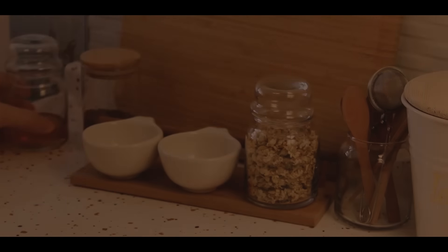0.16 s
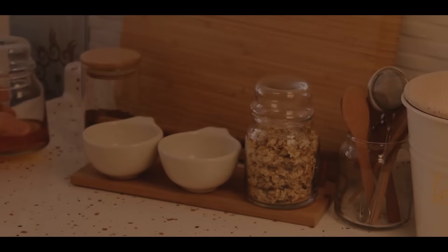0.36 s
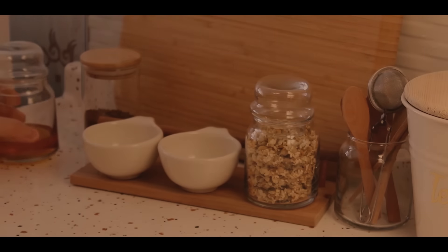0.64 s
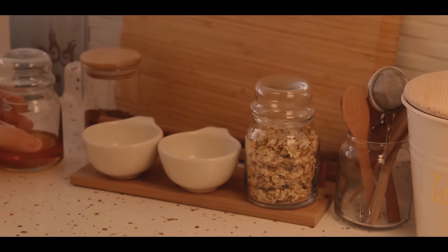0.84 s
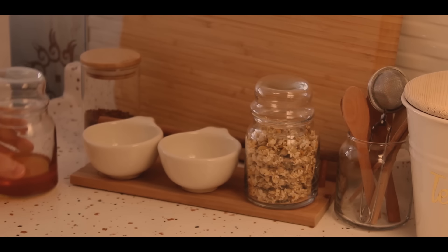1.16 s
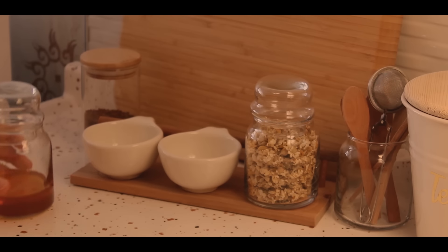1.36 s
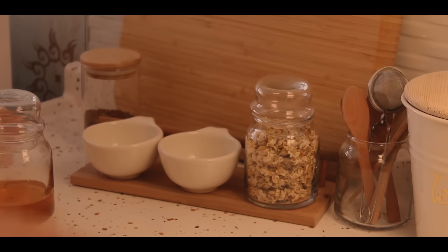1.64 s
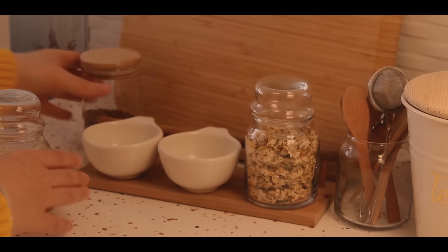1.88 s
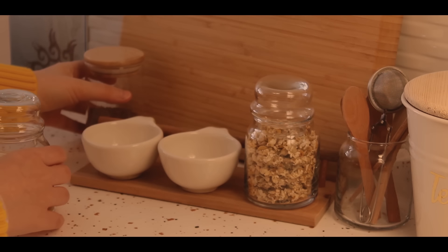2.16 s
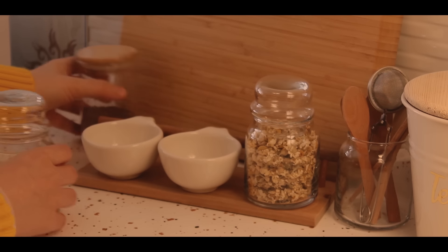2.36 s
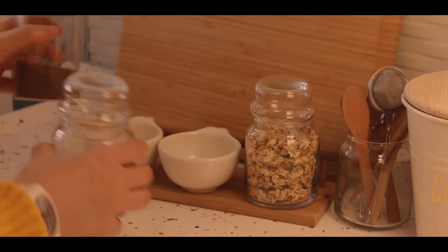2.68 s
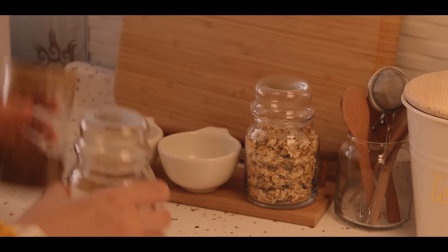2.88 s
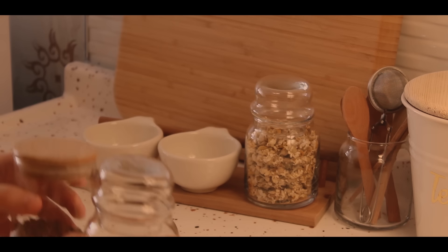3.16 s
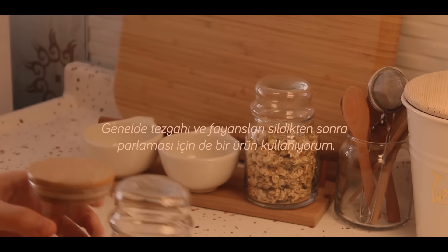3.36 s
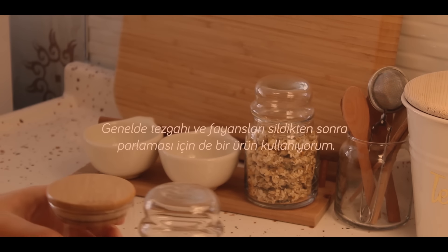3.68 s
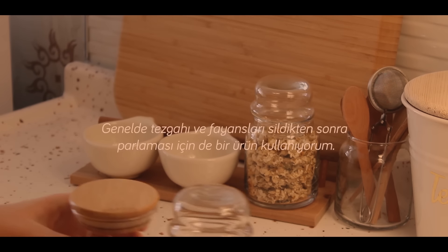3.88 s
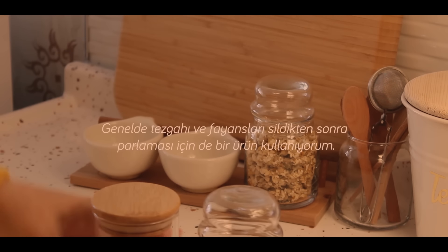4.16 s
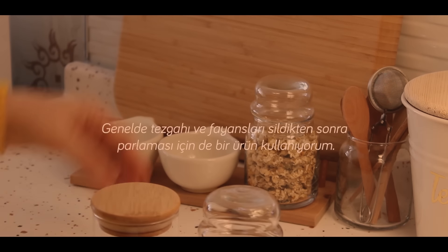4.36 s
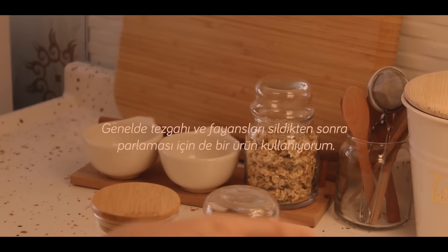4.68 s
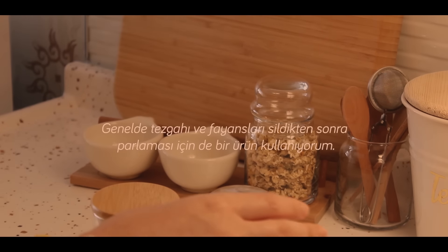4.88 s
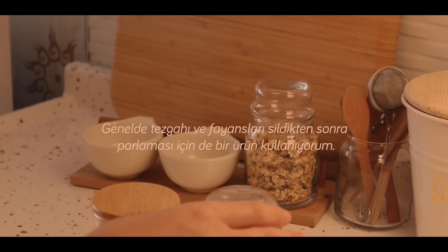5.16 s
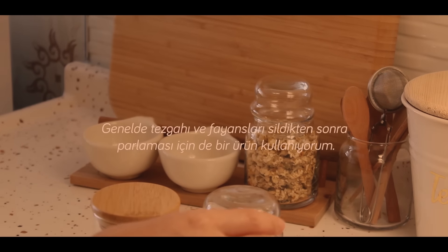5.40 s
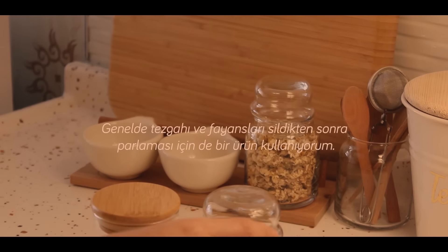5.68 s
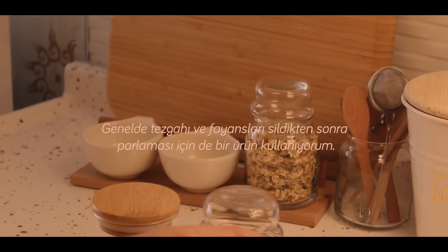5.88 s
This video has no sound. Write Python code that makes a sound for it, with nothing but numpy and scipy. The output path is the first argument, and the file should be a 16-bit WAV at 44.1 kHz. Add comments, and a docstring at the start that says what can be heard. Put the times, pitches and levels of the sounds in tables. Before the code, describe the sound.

A jar clacks down on a stone worktop, a canister lands with a loud knock and rocks, then glass knocks and light fingertip ticks follow.

```python
"""In a small, hard-walled kitchen, glass jars and a wooden-lidded canister move about on a stone countertop.
A jar is slid and set down, the canister bumps off its board, lands and rocks, a glass stopper knocks,
fingers tick on glass. Each blow is a coloured clack with near echoes, ringing tones and a diffuse room tail.
Slides are tiny random slips through a moving resonance; filtered noise and wavering sines make air and hum.
The recorder's noise suppressor shortens the tails."""
import sys
import numpy as np
from scipy import signal
from scipy.fft import rfft, irfft
from scipy.io import wavfile
from scipy.ndimage import uniform_filter1d

SR = 44100
rng = np.random.default_rng(int(sys.argv[2]) if len(sys.argv) > 2 else 0)


def bounce(signal):
    """Save signal as a 16-bit WAV file at the path given by the first command-line argument."""
    frames = np.transpose(np.atleast_2d(signal))
    limited = np.clip(frames, -1, 1)
    pcm = np.round(limited * 32767).astype(np.int16)
    wavfile.write(sys.argv[1], SR, pcm)


N = 266099
T = np.arange(N) / SR
HZ = np.fft.rfftfreq(N, 1 / SR) + 1e-3  # just above zero, for the log axis

# broad colour of a blow on each thing: (frequency [Hz], relative level [dB])
JAR_BODY = [(90, -61.5), (150, -30.5), (230, -34), (341, -14.5), (520, -4.5), (740, -6), (880, -7),
            (1240, -5), (1440, -9), (1740, -10.5), (2070, -19), (2550, -30.5), (3500, -43.5), (5000, -64),
            (9000, -83)]
BOARD_BODY = [(120, -83.5), (200, -73), (338, -13), (390, 2), (520, -18), (630, -11), (682, -5.5),
              (1210, -8.5), (1330, -10), (1400, -13.5), (1690, -8.5), (2110, -28), (2440, -22.5),
              (9000, -67), (11700, -107), (19800, -120)]
CANISTER_BODY = [(55, -57.5), (95, -23), (135, -26.5), (174, -21), (213, -23), (379, -7), (490, -7.5),
                 (600, -5), (778, -1), (1500, -4), (2240, -10.5), (3280, -23.5), (5000, -38), (8600, -66),
                 (14000, -65.5)]
RIM_BODY = [(160, -66.5), (280, -15), (484, -5.5), (556, -2), (938, -3), (1250, -6), (1380, -3),
            (1540, -0.5), (1930, -11), (2300, -7), (3140, -14.5), (5500, -60), (7150, -90.5), (12100, -120)]
LID_BODY = [(240, -71), (400, -30.5), (455, -34.5), (548, -16.5), (661, -18), (1210, -2.5), (1510, -5),
            (1760, -18), (1910, -13), (2770, -18), (3540, -23.5), (6500, -59), (8450, -91), (14300, -120)]
STOPPER_BODY = [(110, -32), (180, -48.5), (255, -30), (350, 0), (440, -8.5), (560, -17), (760, 3.5),
                (930, -4), (1080, -22.5), (1350, -1.5), (1560, -20), (1850, -9.5), (2400, -24),
                (3200, -25.5), (4400, -48.5), (6000, -62), (10000, -83.5)]
TICK_BODY = [(300, 3.5), (800, -0.5), (1300, 3), (2200, -6), (3200, -5), (5200, -7.5), (7000, -13),
             (10000, -13.5), (13000, -19), (15000, -27.5)]
# tones that linger in each thing, the surface under it and the corner of the room:
# (frequency [Hz], relative level [dB])
JAR_MODES = [(522, 5), (574, 9.5), (607, -6.5), (729, 7.5), (797, -14.5), (869, -24.5), (928, -5.5),
             (1048, -14.5), (1121, -17.5), (1150, -17.5), (1190, -10), (1227, 3.5), (1265, 9.5),
             (1291, 4.5), (1359, -19), (1666, -14.5), (1690, 7.5), (1737, 3)]
BOARD_MODES = [(394, 4), (426, -14.5), (683, 0), (752, -19), (777, -6), (842, 4.5), (874, -10), (914, -23),
               (946, -12), (986, -12), (1048, -10), (1087, -2.5), (1129, -14), (1293, 2), (1475, -22),
               (1647, -22), (1687, -15), (1738, -4), (2349, -14), (2635, -18)]
CANISTER_MODES = [(176, -18), (386, -9.5), (496, -0.5), (543, -6), (672, -11.5), (750, -2.5), (784, -4),
                  (861, -3), (926, -3.5), (988, -3), (1025, 0), (1062, 1), (1124, -6.5), (1179, -4),
                  (1211, -1), (1289, -1), (1320, 0.5), (1355, -4), (1390, -10), (1453, -4.5), (1496, -2),
                  (1529, 3), (1772, -4.5), (1846, -1.5), (1878, -7), (1941, -9), (2069, -12.5),
                  (2201, -12.5), (2311, -6.5), (2434, -6)]
RIM_MODES = [(565, 6), (591, 1.5), (723, -8), (794, 2), (826, 2), (939, -6), (984, 1.5), (1063, 7.5),
             (1143, -5), (1212, 7.5), (1289, -20), (1513, 10.5), (1548, -16), (1604, -18), (1681, 5),
             (2281, -18.5), (2350, -7), (2647, -20)]
LID_MODES = [(796, -8.5), (1042, 3.5), (1098, -2), (1135, -20), (1179, -14), (1243, 6.5), (1291, 11.5),
             (1321, -16), (1394, -9.5), (1514, -7.5), (1544, 1.5), (1684, 3.5), (1973, -1.5), (2295, -21.5),
             (2432, 0), (2673, -11)]
STOPPER_MODES = [(298, -15.5), (357, -6.5), (396, -8.5), (498, -7), (653, -15), (690, -17.5), (739, -8),
                 (773, -25), (799, -13.5), (826, -18), (859, -19), (898, -6.5), (945, 2.5), (981, -6),
                 (1300, -11.5), (1342, -13), (1392, -27.5), (1762, -16), (2050, -21)]
TICK_MODES = [(1288, -0.5), (1420, -9), (2350, -7.5), (3120, -8), (3350, -10.5), (4150, -9), (4480, -8.5),
              (5300, -13), (5850, -14), (6500, -11.5), (8500, -7.5)]
# what is struck, by name: (body, modes, level of the modes against the room tail [dB],
# decay time of tones and tail [share of ROOM_T60])
THINGS = {"jar": (JAR_BODY, JAR_MODES, 0, 0.75), "board": (BOARD_BODY, BOARD_MODES, 0, 0.75),
          "canister": (CANISTER_BODY, CANISTER_MODES, 0.74, 0.84), "rim": (RIM_BODY, RIM_MODES, -0.3, 0.97),
          "lid": (LID_BODY, LID_MODES, -1.9, 0.74), "stopper": (STOPPER_BODY, STOPPER_MODES, 0.96, 0.84),
          "tick": (TICK_BODY, TICK_MODES, -4, .85)}
# blows: (time [s], thing, level [dB], high edge set by the hardness of the contact [Hz],
# lingering part against the clack [dB])
BLOWS = [ (0.8417, "jar", 5.5, 9000, 0.5), (0.961, "jar", -3.5, 1020, 0), (1.097, "jar", -14.5, 801, 3.5),
         (1.272, "jar", -17.5, 851, -3.5), (1.430, "jar", -16.5, 993, -2.5),
         (2.312, "board", 0, 12000, 3.5), (3.5430, "canister", 14.5, 15000, 1.5),
         (3.7110, "rim", 5.5, 9000, -2.5), (3.8620, "lid", 1.5, 8900, 2.5), (4.035, "lid", -13.5, 2045, 4),
         (5.175, "stopper", -9, 554, 9), (5.2166, "stopper", 11.5, 9050, -1.5),
         (5.275, "stopper", 3, 1567, -5.5), (5.462, "stopper", -24, 1097, 6),
         (6.013, "stopper", -6, 328, -5), ]
# reflections from worktop, back wall and cupboards, before scatter: (delay [s], level [dB])
NEAR_ECHOES = [(.0012, -11.5), (.0023, -7), (.0041, -6.5), (.0064, -10.5), (.018, -8.5)]
# room decay before each sound's stretch: (frequency [Hz], time to fall 60 dB [s])
ROOM_T60 = [(150, .58), (500, 0.53), (1400, 0.49), (3500, 0.41), (7000, 0.16), (14000, 0.2)]
# colour of the still room air: (frequency [Hz], relative level [dB])
AIR = [(15, -39.5), (25, -13), (71, -18.5), (101, -8), (125, -8.5), (196, -4.5), (363, -4.5), (394, -3),
       (488, -3), (769, -5), (13500, -31.5), (15000, -49.5)]
# appliance hum before waver and suppression make-up: (frequency [Hz], rms level [dB])
HUM = [(50, -92), (100, -83), (197, -82.5), (290, -76.5), (395, -77.5), (445, -81.5), (494, -77)]
# round trips of a blow inside the vessel and the slab, before scatter: (time [s])
SLAB_PATHS_S = [.00027, .00075]
# fingers on glass: (time [s], level [dB], low edge, low for a fingertip and high for a nail [Hz])
TICKS = [(5.034, -24.5, 600), (5.177, -20.5, 118.4), (5.418, -29.5, 4500), (5.478, -21.5, 3330),
         (5.559, -17.5, 2900), (5.881, -13, 900), (5.915, -22, 3560), (6.007, -13, 3900),
         (6.017, -12, 4000)]
# pushes of the glass base over the stone, level before the swell and sag:
# (time [s], length [s], rms level [dB], first resonance [Hz], last resonance [Hz])
PUSHES = [(0.179, 0.2, -59.5, 690, 700), (0.342, 0.087, -53, 1180, 1240), (1.02, 0.3, -46.5, 642, 463),
          (1.26, 0.43, -47, 624, 933)]
# things whose blows make the canister's glass wall click: (thing)
CLICKING = ("canister", "rim")

AIR_DB = -66  # rms, before waver and suppression make-up
SUPPRESSION_DB = 4.5  # how far the recorder turns down a shut band
TOP_HZ = 15200  # the recorder's upper limit
# a heavier blow moves more of the slab: low edge at 0 dB, and the extra force that lowers it an octave
BASS_EDGE_HZ, BASS_OCTAVE_DB = 250, 16
# wall click: level at a blow of 0 dB, dB gained per dB of blow, then its band and lingering part
CLICK_DB, CLICK_GROWTH = -43.5, 1.72
CLICK_LOW_HZ, CLICK_HIGH_HZ, CLICK_LINGER_DB = 7500, 12440, 3
# a sharper tick also reaches higher: band of a nail, and how the high edge follows the low one (exponent)
NAIL_LOW_HZ, NAIL_HIGH_HZ, TICK_EDGE_POWER = 3400, 13100, 0.48
TICK_LINGER_DB = 0
# the finger slips and catches once more, this much later and weaker
CATCH_S, CATCH_DB = 0.005, -7
# every push swells quickly, eases off as the hand slows and dies away
PUSH_ATTACK_S, PUSH_SAG_DB_PER_S, PUSH_RELEASE_S = 0.024, 30.5, 0.087


def undb(db):
    """Decibels to gain."""
    return 10 ** (np.asarray(db) / 20)


def unit(x):
    """Scale to an energy of 1."""
    return x / np.sqrt(np.sum(x ** 2))


def level(x, db):
    """Scale by the standard deviation to an rms level in dB."""
    return x * undb(db) / np.std(x)


def along(points, hz):
    """Read (Hz, value) points on a log-frequency axis."""
    f, value = np.transpose(points)
    return np.interp(np.log(hz), np.log(f), value)


def colour(x, points):
    """Causal minimum-phase filter with the given (Hz, dB) response, made by folding its cepstrum."""
    log_gain = np.log(undb(along(points, HZ)))
    cepstrum = irfft(log_gain, N)[:2048]
    cepstrum[1:] *= 2
    response = irfft(np.exp(rfft(cepstrum, 8192)))[:2048]
    return signal.fftconvolve(x, response)[:len(x)]


def band(x, low_hz, high_hz, order=2):
    """Band-pass between two edges."""
    high_hz = min(high_hz, .47 * SR)
    low_hz = min(low_hz, high_hz / 2)
    sos = signal.butter(order, [low_hz, high_hz], "band", fs=SR, output="sos")
    return signal.sosfilt(sos, x)


def walk(rate):
    """Slow random drift with a spread of 1, heading for a new value rate times a second."""
    hold = int(SR / rate)
    steps = np.repeat(rng.standard_normal(N // hold + 1), hold)
    return level(uniform_filter1d(steps, hold)[:N], 0)


def add(out, s, x):
    """Mix x into out from time s."""
    i = int(s * SR)
    out[i:i + len(x)] += x[:N - i]


def kitchen(waver_db=3.5, drift=1.0):
    """Still room air and the slightly wavering hum of an appliance."""
    air = level(colour(rng.standard_normal(N), AIR), AIR_DB) * undb(0.18 * walk(2.5))
    hum = 0
    for hz, db in HUM:
        tone = np.sin(2 * np.pi * hz * T + drift * walk(7.9))
        hum = hum + level(tone, db) * undb(waver_db * walk(7))
    return (air + hum) * undb(SUPPRESSION_DB)  # make up for what the suppressor takes away


def room_tail(stretch, build_s=0.013, even_hz=70):
    """Diffuse kitchen reverberation: equal energy per Hz, each band fading at its own rate."""
    t, hz = T[:SR], np.arange(SR // 2 + 1)
    noise, tail = rfft(rng.standard_normal(SR)), 0
    edges = np.geomspace(30, SR / 2, 30)
    for lo, hi in zip(edges, edges[1:]):
        part = irfft(noise * ((hz >= lo) & (hz < hi)), SR)
        t60_s = stretch * along(ROOM_T60, np.sqrt(lo * hi))
        tail = tail + part * np.exp(-np.log(1000) * t / t60_s)
    spectrum = rfft(tail * (1 - np.exp(-t / build_s)))
    # smooth the power twice, then divide it out to even the spectrum
    power = uniform_filter1d(abs(spectrum) ** 2, even_hz)
    power = uniform_filter1d(power, even_hz)
    even = irfft(spectrum * (hz > edges[0]) / np.sqrt(power), SR)
    end_fade = np.clip(2 - 2 * t / t[-1], 0, 1) ** 2
    return unit(even * end_fade)


def slides(slips_per_s=3500, width=0.3, grit_db=-16, room_db=-2, room_stretch=0.43):
    """Tiny slips of the glass base on stone excite a resonance that moves as the jar is pushed along."""
    out = np.zeros(N)
    for s, length_s, db, first_hz, last_hz in PUSHES:
        t = np.arange(0, length_s, 1 / SR)
        slips = rng.standard_normal(N) * (rng.random(N) < slips_per_s / SR)
        f, frames, z = signal.stft(colour(slips[:len(t)], JAR_BODY), SR, nperseg=512)
        centre_hz = np.interp(frames, [0, length_s], [first_hz, last_hz])
        octaves = np.log2((f[:, None] + 1) / centre_hz)
        resonance = np.exp(-.5 * (octaves / width) ** 2)
        rub = signal.istft(z * (resonance + undb(grit_db)), SR)[1][:len(t)]
        effort = np.minimum(t / PUSH_ATTACK_S, 1) * np.minimum((length_s - t) / PUSH_RELEASE_S, 1)
        add(out, s, level(rub, db) * effort * undb(-PUSH_SAG_DB_PER_S * t))
    return out + undb(room_db) * signal.fftconvolve(out, room_tail(room_stretch))[:N]


def contact(spread=0.13, feedback=.5):
    """The first push, scattered over a few milliseconds by the slab, and its near reflections."""
    push = signal.unit_impulse(SR)
    for path_s in SLAB_PATHS_S:
        loop = np.zeros(int(abs(path_s * (1 + spread * rng.standard_normal())) * SR) + 2)
        loop[0], loop[-1] = 1, feedback
        # all-pass: spreads in time, keeps the colour
        push = signal.lfilter(loop[::-1], loop, push + 1e-18)
    out = push
    for delay_s, db in NEAR_ECHOES:
        lag = int(abs(delay_s * (1 + spread * rng.standard_normal())) * SR)
        sign = rng.choice([-1, 1])  # opposite sides of a vessel radiate with opposite sign
        out = out + sign * undb(db) * np.roll(push, lag)
    return out


def ring(modes, stretch, rise_s=0.0017):
    """Tones that build up quickly after the blow and decay at the room's rate for their pitch."""
    t = T[:SR]
    tones = 0
    for hz, db in modes:
        fade = np.exp(-np.log(1000) * t / (stretch * along(ROOM_T60, hz)))
        tones = tones + undb(db) * fade * np.sin(2 * np.pi * (hz * t + rng.random()))
    return unit(tones * (1 - np.exp(-t / rise_s)))


def strike(thing, low_hz, high_hz, linger_db):
    """A short clack, then lingering tones and the room's answer; a soft contact loses the treble."""
    body, modes, ring_db, stretch = THINGS[thing]
    clack = unit(colour(contact(), body))
    room = unit(colour(room_tail(stretch), body))
    linger = room + undb(ring_db) * ring(modes, stretch)
    return band(clack + undb(linger_db) * linger, low_hz, high_hz)


def knocks():
    """Blows on the counter: the harder, the deeper they reach and the more the canister's wall clicks."""
    out = np.zeros(N)
    for s, thing, db, high_hz, linger_db in BLOWS:
        low_hz = BASS_EDGE_HZ * 2 ** (-db / BASS_OCTAVE_DB)
        add(out, s, undb(db) * strike(thing, low_hz, high_hz, linger_db))
        if thing in CLICKING:
            click = strike("tick", CLICK_LOW_HZ, CLICK_HIGH_HZ, CLICK_LINGER_DB)
            add(out, s, undb(CLICK_DB + CLICK_GROWTH * db) * click)
    return out


def fingers():
    """A finger ticks on the glass, slips and catches again; a sharper contact shifts the band upward."""
    out = np.zeros(N)
    for s, db, low_hz in TICKS:
        high_hz = NAIL_HIGH_HZ * (low_hz / NAIL_LOW_HZ) ** TICK_EDGE_POWER
        tick = strike("tick", low_hz, high_hz, TICK_LINGER_DB)
        catch = strike("tick", low_hz, high_hz, TICK_LINGER_DB)
        add(out, s, undb(db) * tick)
        add(out, s + CATCH_S, undb(db + CATCH_DB) * catch)
    return out


def scene():
    """Slides, knocks and finger ticks in the quiet kitchen."""
    return (kitchen() + slides() + knocks() + fingers())[None]


def suppress(x, open_db=13):
    """Noise suppressor: a band opens only while it stands well over its usual level, so tails end early."""
    z = signal.stft(x, SR, nperseg=1024, noverlap=768)[2]
    power = uniform_filter1d(abs(z) ** 2, size=13, axis=0)  # smooth over frequency
    power = uniform_filter1d(power, size=3, axis=1)  # then over time
    usual = np.percentile(power, 35, axis=1, keepdims=True) + 1e-20
    shut = 1 / (1 + (power / usual / undb(open_db) ** 2) ** 2)  # half shut at open_db over usual
    return signal.istft(z * undb(-SUPPRESSION_DB * shut), SR, nperseg=1024, noverlap=768)[1][:N]


def record(dry):
    """The recorder turns down steady noise and cuts the top with a steep low-pass."""
    top_cut = signal.ellip(8, .2, 70, TOP_HZ, fs=SR, output="sos")
    return signal.sosfilt(top_cut, suppress(dry[0]))[None]


dry = scene()
out = record(dry)
bounce(out)
```